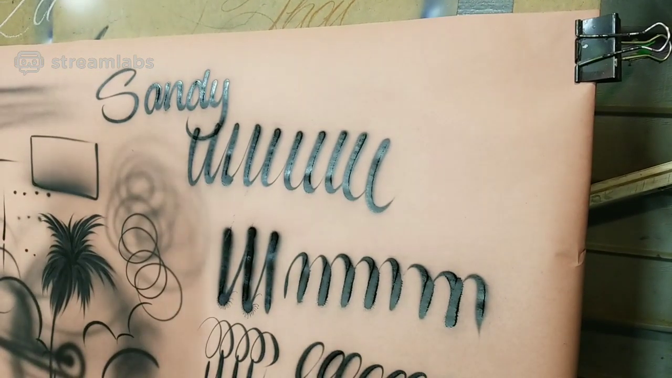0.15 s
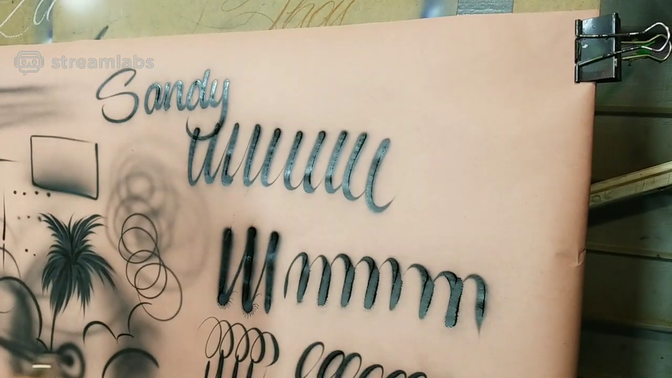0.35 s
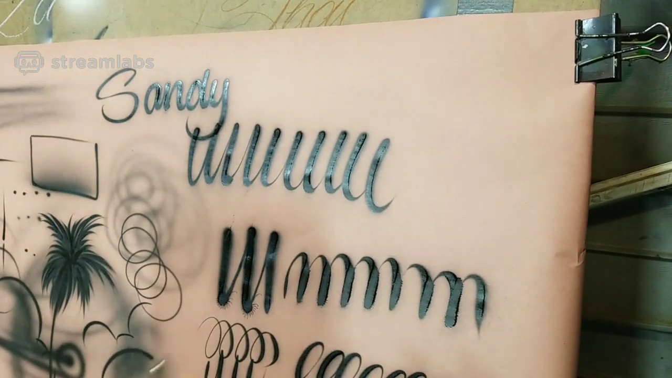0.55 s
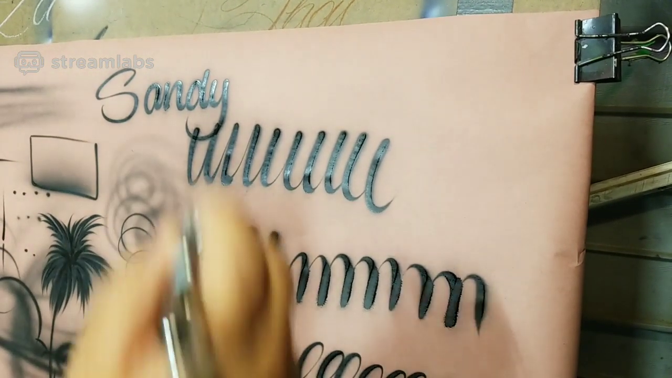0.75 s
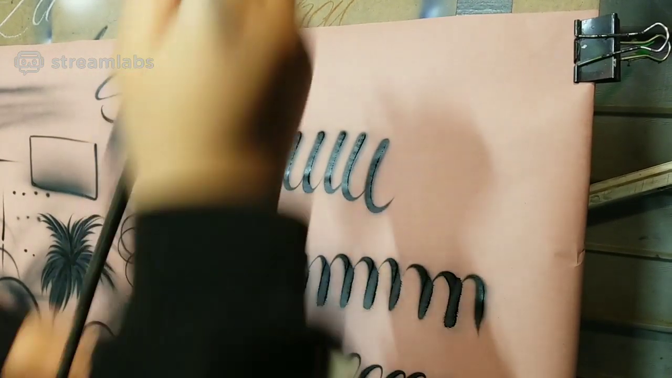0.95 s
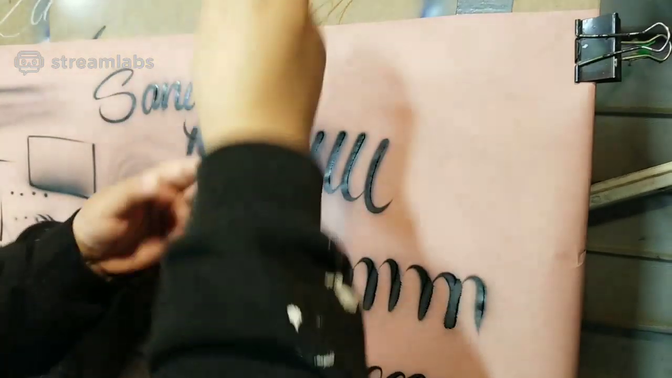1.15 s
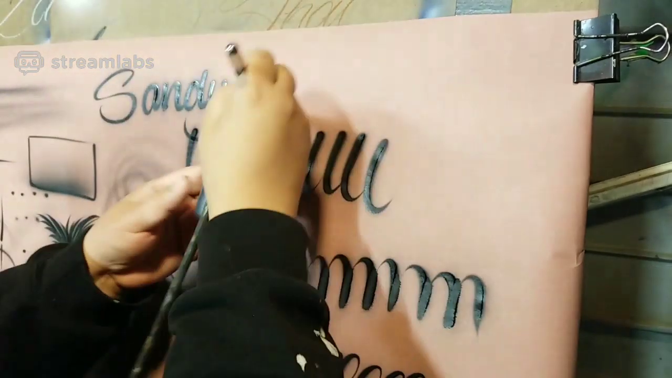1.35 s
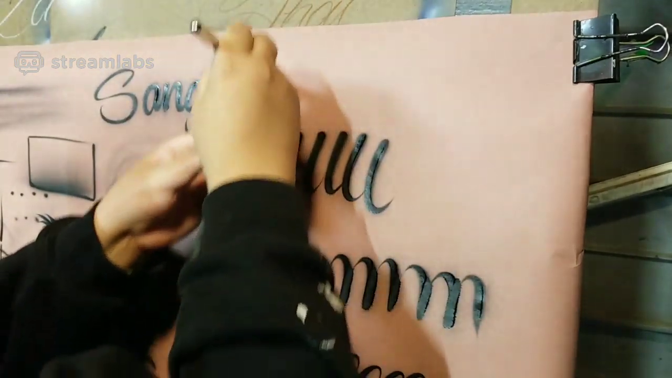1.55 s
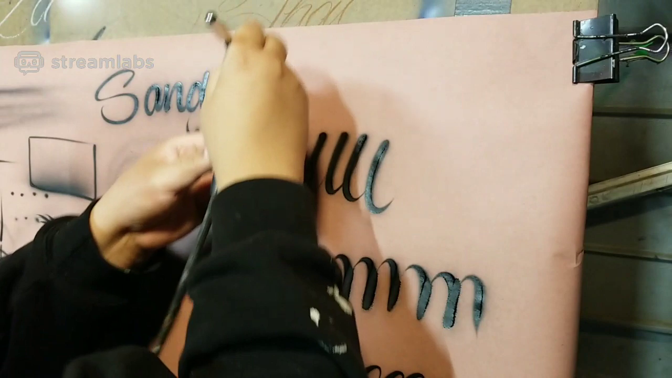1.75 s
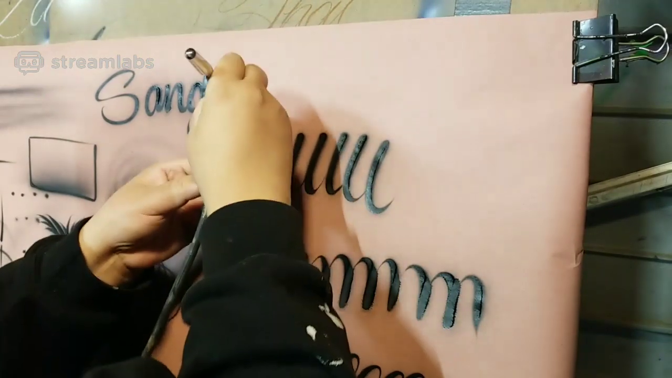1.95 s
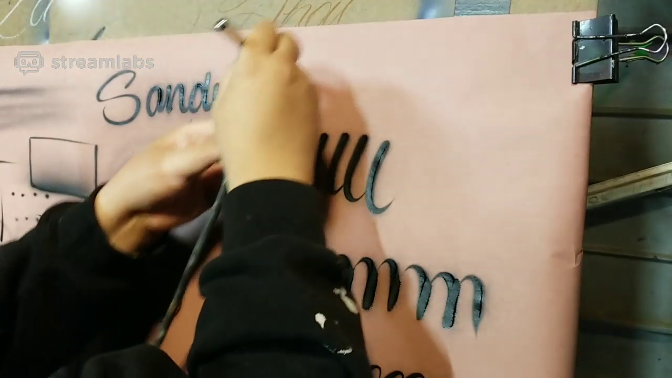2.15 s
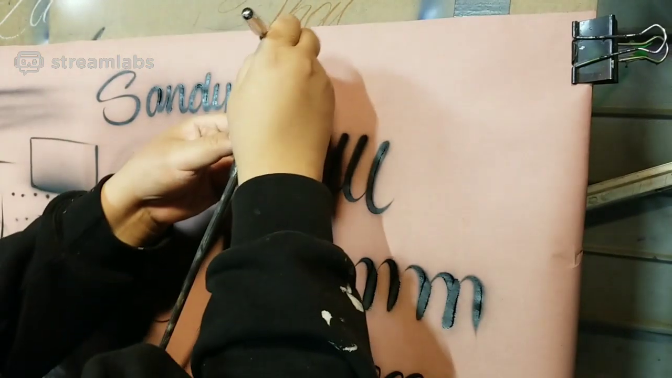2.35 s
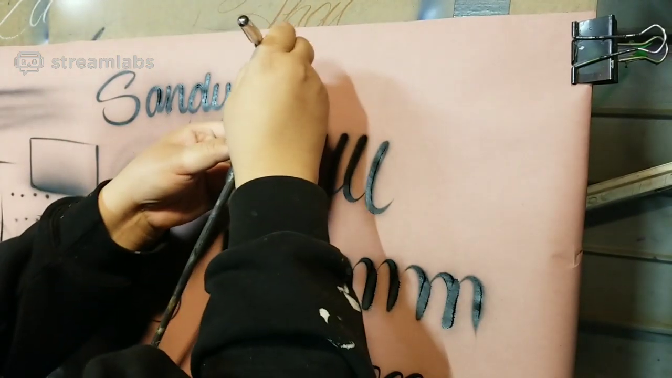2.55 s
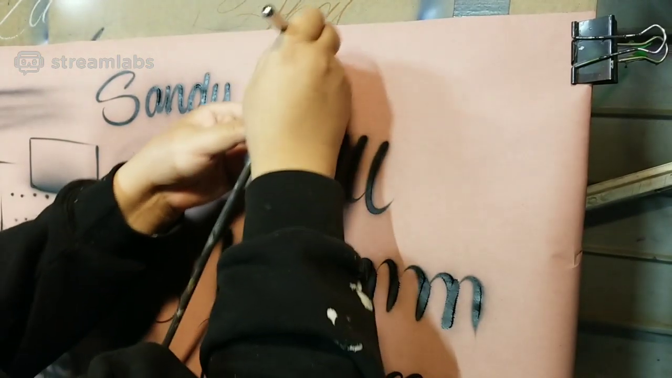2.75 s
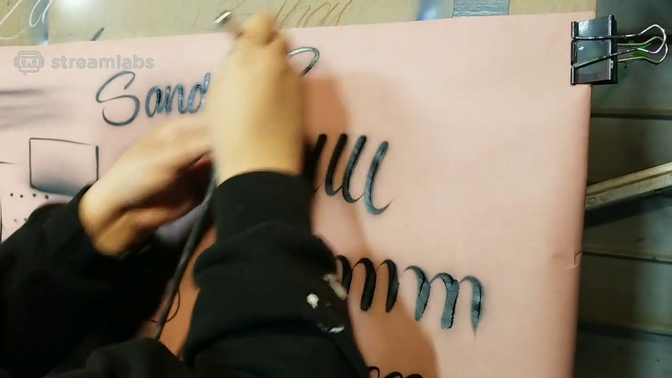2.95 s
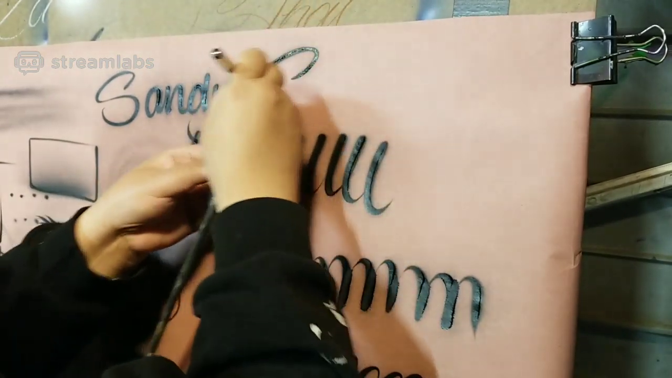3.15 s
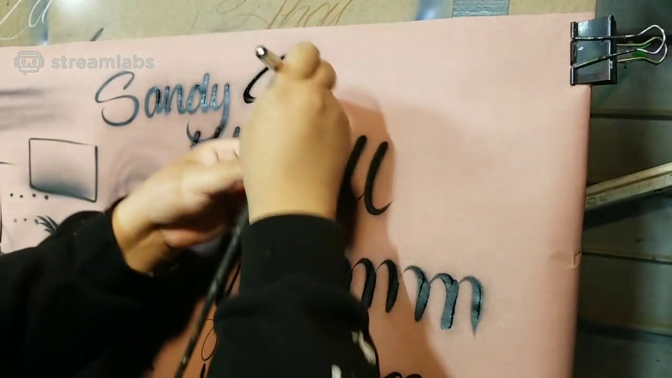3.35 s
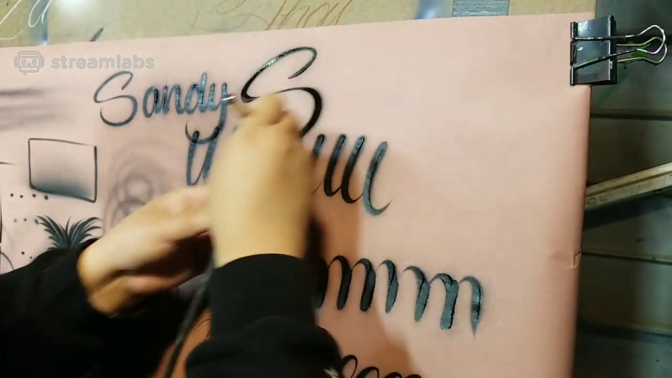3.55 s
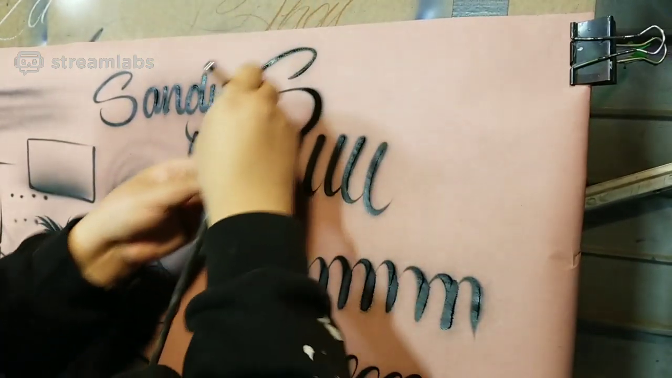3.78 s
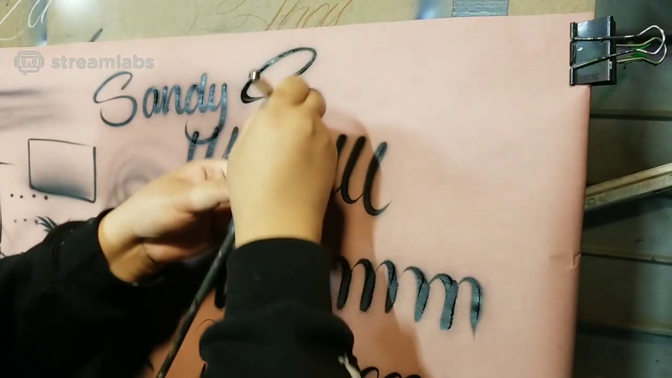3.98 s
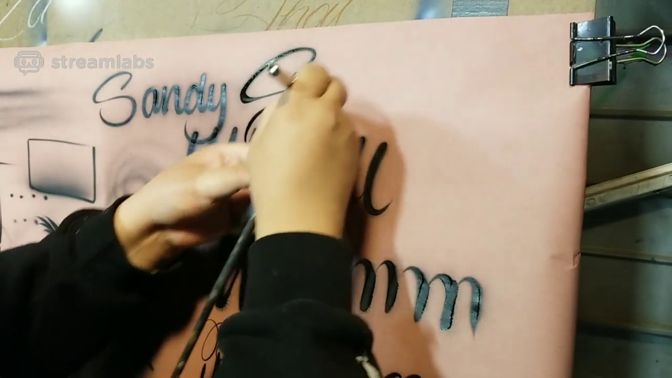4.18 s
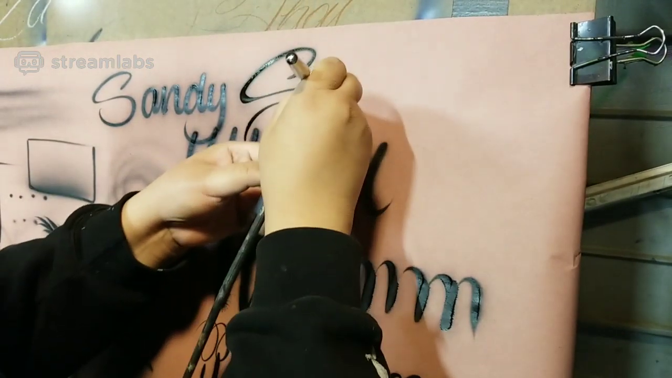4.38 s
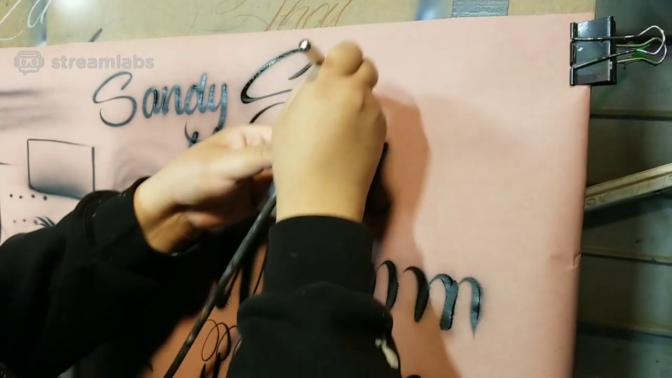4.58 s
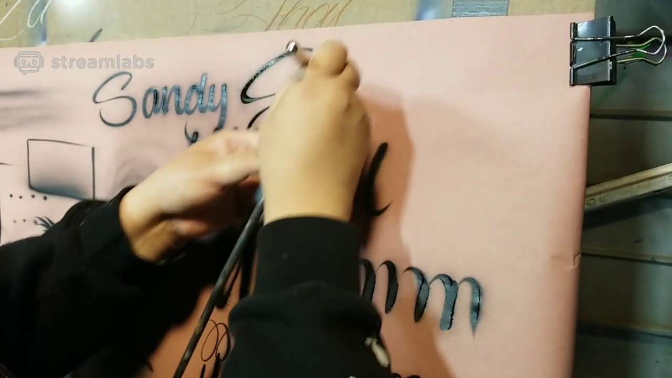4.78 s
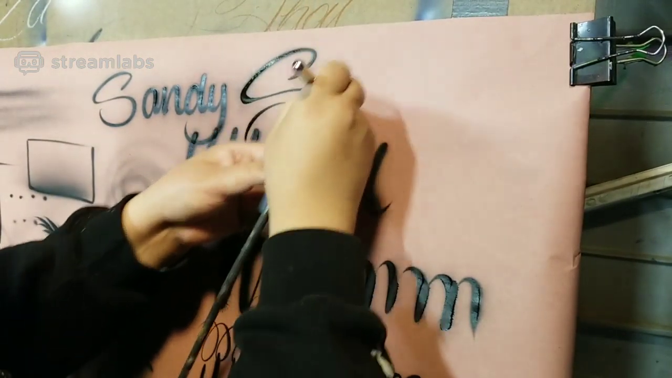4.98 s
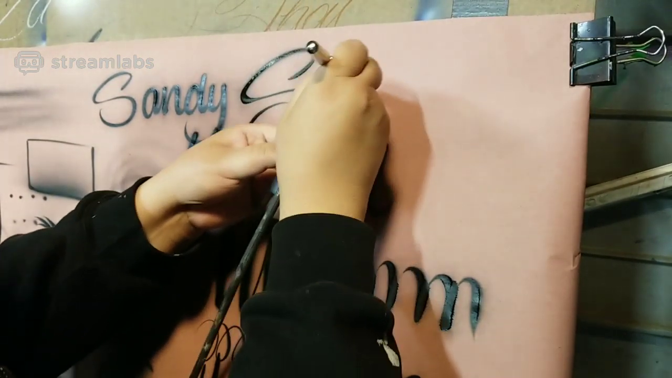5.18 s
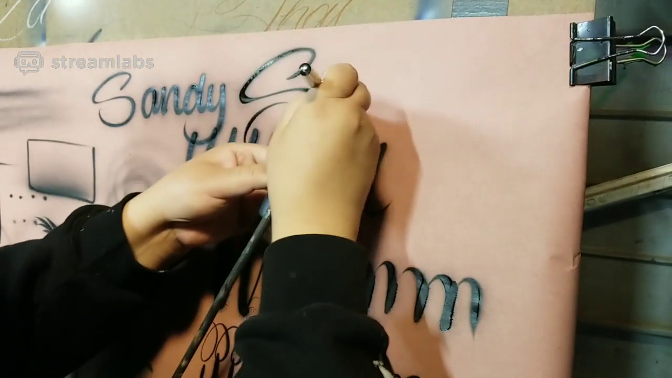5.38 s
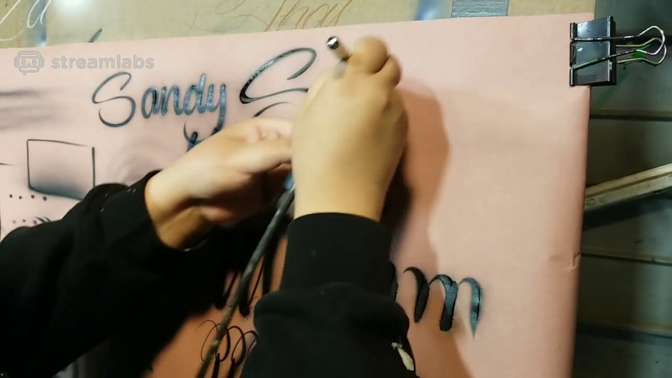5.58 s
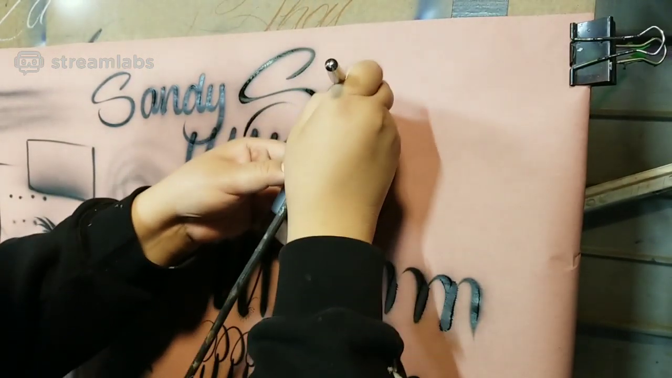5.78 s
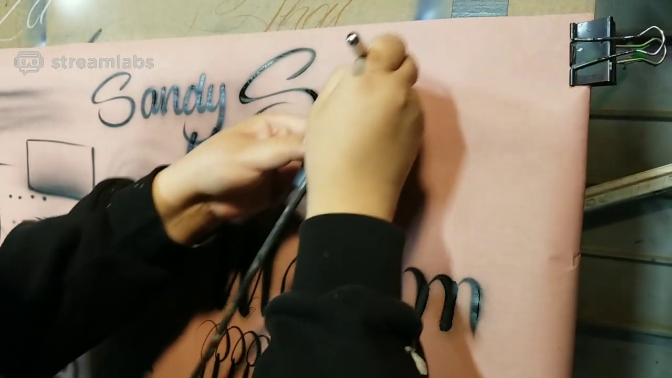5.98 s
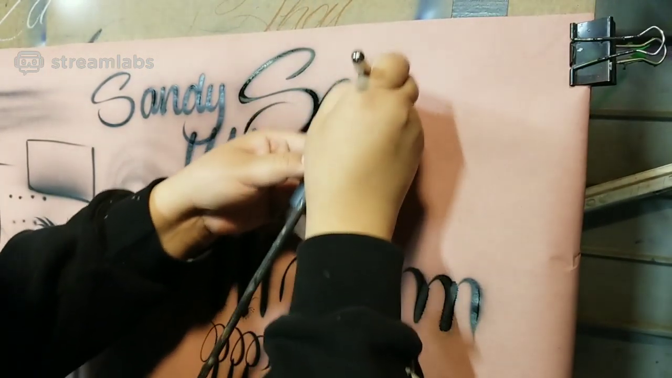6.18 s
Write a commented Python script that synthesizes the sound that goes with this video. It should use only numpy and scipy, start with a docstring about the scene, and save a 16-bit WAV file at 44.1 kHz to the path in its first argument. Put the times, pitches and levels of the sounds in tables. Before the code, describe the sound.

A close stereo microphone, stronger on the left, catches a few gritty rustles and a short hollow thump over faint room air and low street rumble. After tiny clicks, a sharp, high spray of compressed air begins, rougher at first, then thinner, pulsing two or three times a second with brief dips. A distant engine climbs faintly in the background, changes gear, then fades, leaving tyre wash and muffled bumps.

```python
"""A few scuffs of shoes and sleeves close by, then an airbrush hisses on paper, swelling with each stroke.
Outside a vehicle pulls away through two gears and thumps over bumps; the workshop hums faintly. The left port hears more.
Spray, scuffs, tyres and air are filtered noise; exhaust, bumps, hum and hollow knocks are sines;
small ticks are impulses ringing in resonators. The microphone has two ports and a steep upper limit."""
import sys
import numpy as np
from scipy import signal
from scipy.io import wavfile
from scipy.ndimage import uniform_filter1d, map_coordinates

SR = 44100
rng = np.random.default_rng(int(sys.argv[2]) if len(sys.argv) > 2 else 0)


def int16_out(signal):
    """Quantize to a 16-bit WAV file."""
    q = np.round(np.clip(np.atleast_2d(signal).T, -1, 1) * 32767)
    wavfile.write(sys.argv[1], SR, q.astype(np.int16))


N = 274743

# Microphone: likeness of the two ports by pitch [f/Hz, likeness]
PORT_LIKENESS = [(60, 0.92), (130, 0.9), (290, 0.66), (640, 0.25), (1410, -0.069), (3100, -0.0076),
                 (6820, 0.26), (15000, -0.055)]
# Microphone: balance of the two ports by pitch [f/Hz, left over right level/dB]
PORT_BALANCE = [(30, 5), (92, 3.5), (210, 9), (330, 10.5), (500, 4.5), (1170, 6), (2740, 10), (4190, 6.5),
                (6410, 0), (9000, 1.5), (11500, 2), (13000, 8), (14500, 7), (15500, 17)]
# Room air: spectrum [f/Hz, density level/dB per Hz]
ROOM_SPECTRUM = [(600, 16), (800, -3.5), (1300, -10), (2200, 0), (3600, -2), (7000, -0.5), (9000, -8),
                 (12500, -4), (15500, -1.5)]
# Room: steady hum tones [f/Hz, level/dB]
HUM_TONES = [(59.5, -74), (657, -81.5)]
# Street outside [t/s, exhaust level/dB, rumble level/dB, tyre wash level/dB]
STREET_LEVELS = [(0, -70, -67, -78), (.5, -77, -69.5, -88), (1.3, -70.5, -69.5, -71),
                 (1.75, -69, -65.5, -69.5), (2.15, -63, -66, -68.5), (2.5, -71.5, -66.5, -67.5),
                 (3.4, -64, -64, -66), (4, -56.5, -61, -66.5), (4.65, -66, -62.5, -65),
                 (4.95, -60, -60, -60), (5.22, -69, -60.5, -62.5), (5.36, -86, -62, -63),
                 (6.23, -90, -62.5, -57.5)]
# Street rumble: spectrum [f/Hz, density level/dB per Hz]
RUMBLE_SPECTRUM = [(12, -60), (20, -20), (48, -5), (80, -3), (113, -2), (201, -12), (309, -10.5),
                   (420, -38), (550, -66), (920, -120)]
# Tyre wash: spectrum [f/Hz, density level/dB per Hz]
WASH_SPECTRUM = [(200, -3), (350, -8.5), (550, -2.5), (800, -1.5), (1100, -7.5), (1600, -4)]
# Vehicle gears [engaged t/s, exhaust note f/Hz, initial climb/(Hz/s), easing time/s]
GEAR_CLIMBS = [(0, 123.9, 44, 6), (1.78, 128.5, 16, 2.9)]
# Exhaust orders [multiple of the note, level/dB, flutter level/dB]
EXHAUST_ORDERS = [(1, 2.5, 2), (1.5, -10.5, 6.5), (2, -11.5, 4)]
# Road bumps under the vehicle [t/s, level/dB, f/Hz]
ROAD_BUMPS = [(3.581, -45.5, 83), (3.792, -44.5, 83.4), (4.94, -46, 82.5), (5.037, -50, 77.4),
              (5.142, -48, 75.4), (5.325, -51, 86.1), (5.399, -50, 67.3), (5.615, -51, 83.4),
              (5.88, -45, 84), (6.187, -48, 104)]
# Bumps against something hollow [t/s, level/dB, swell time/s]
HOLLOW_KNOCKS = [(1.137, -40.5, 0.0066), (1.378, -52, 0.01)]
# Scuffs of shoes and sleeves
# [t/s, level/dB, rise/s, t60/s, grit f/Hz, grit width/Hz, relative knock level/dB, relative swish level/dB]
SCUFF_EVENTS = [(0.0, -63.5, 0.00067, 0.41, 3540, 3020, -6, -3),
                (0.142, -56.5, 0.015, 0.3, 3830, 3000, -2, -8),
                (.22, -70, .004, 0.19, 3500, 3000, -10, -12),
                (.538, -55, 0.048, 0.22, 4570, 2700, -14.5, -8),
                (0.739, -46.5, 0.02, 0.31, 3260, 3180, -8, -7),
                (1.132, -42, 0.0065, 0.31, 2670, 2270, 0.5, -41),
                (1.309, -66.5, 0.032, 1, 3700, 3950, 3, -22),
                (1.372, -59, 0.035, 0.48, 3000, 2980, 4.5, -20),
                (1.401, -58, 0.014, 0.26, 4360, 4970, -3, -2),
                (1.44, -57.5, 0.011, 0.74, 3140, 2500, 2.5, -16)]
# Floorboard resonances excited by the scuffs [f/Hz, width/Hz, level/dB]
BOARD_MODES = [(150, 230, -8), (352, 51, -3), (523, 240, -4.5), (834, 85, 0), (1090, 220, -5),
               (2070, 350, -6)]
# Small dry ticks [t/s, blow level/dB, relative blow level of the lower ring/dB]
DRY_TICKS = [(1.443, -21, -14), (1.538, -22, 2)]
# Airbrush strokes, dipping at each turn of the hand
# [t/s, nozzle level/dB, jet-on-paper level/dB, nozzle fullness level/dB]
STROKES = [(1.66, -35, -37.5, -6), (1.93, -32, -38, -8), (2.1, -33, -41, -5), (2.31, -31.5, -37.5, -10),
           (2.5, -29.5, -43.5, -8.5), (2.65, -40.5, -49.5, -5.5), (2.84, -29.5, -42, -8.5),
           (2.96, -29, -38.5, -7), (3.25, -39.5, -47, -4.5), (3.35, -31, -44.5, -4),
           (3.44, -34.5, -36.5, -3.5), (3.62, -31.5, -38, -7), (3.82, -41, -48.5, -2.5),
           (3.96, -31.5, -43.5, -8), (4.09, -34.5, -46, -7.5), (4.27, -31.5, -37, -3.5),
           (4.53, -31, -45, -19), (4.74, -30, -40, -4), (4.88, -28, -39, -9.5), (5.05, -35, -44.5, -9.5),
           (5.2, -32, -42, -4.5), (5.34, -31, -41, -9.5), (5.49, -39, -45.5, -6), (5.63, -30.5, -40, -4),
           (5.77, -31, -39, -5), (5.92, -36.5, -46, -7.5), (6.08, -32, -38, -2), (6.23, -33.5, -37, -9)]
# Nozzle hiss: spectrum [f/Hz, density level/dB per Hz]
NOZZLE_SPECTRUM = [(7500, -52), (8700, -20), (10500, -12), (11500, -5.5), (13000, -5.5), (14200, -1),
                   (15000, -4), (15700, -1.5)]
# Jet striking paper: spectrum [f/Hz, density level/dB per Hz]
PAPER_SPECTRUM = [(600, -18.5), (900, -19), (1400, -12), (2300, -5.5), (3300, -1), (4300, -0.5),
                  (5500, -2.5), (7300, -1), (8600, -6), (10500, -3.5)]
# Nozzle fullness by pitch [f/Hz, share of the fullness level]
FULLNESS_SHARES = [(9000, 0.94), (12000, 1.06), (13800, 0.07)]
# Low side of the paper roar by pitch [f/Hz, share of the depth level]
DEPTH_SHARES = [(800, 0.44), (1500, 1.16), (2400, 0.56), (3500, 0.02)]
# High side of the paper roar by pitch [f/Hz, share of the edge level]
EDGE_SHARES = [(3000, -0.21), (4800, -0.064), (7000, 0.36)]
# Slow colour change of the paper roar [t/s, low-side level/dB, high-side level/dB]
ROAR_COLOURS = [(1.7, -1, 0.5), (2.4, -5, -1), (3.3, -5, 1), (3.9, -2.5, -2.5), (4.3, -1, 2.5),
                (4.9, -2, 3.5), (5.6, -2, 6), (6.23, -2.5, 1)]

CUTOFF_HZ = 15500
ROOM_DB = -74.5
LIFT_OFF_S, SAG_HZ_PER_S = 4.83, 85   # the driver lifts off and the note sags
HOLLOW_HZ = 867
TRIGGER_S, OPENING_S = 1.609, .013
STROKE_SMOOTH_S = 0.1   # the hand rounds every change
USUAL_NOZZLE_DB, USUAL_PAPER_DB, USUAL_FULLNESS_DB = -33.5, -36, -5.5
BUILD_S, BUILD_DB = .025, -5.5   # pressure builds after the valve opens
BLAST_DEPTH_DB, BLAST_FADE_S = 6, 0.24   # the first blast on the paper is deeper, then thins
DEPTH_PER_DB = -.3   # dB per dB: a stronger jet on the paper has less low side
EDGE_PER_DB, BLAST_EDGE_DB = .5, -8   # the high side grows as the nozzle gains on the paper
PAN_PER_NOZZLE_DB, PAN_PER_FULLNESS_DB = .4, 0.05   # a louder, fuller nozzle faces the left port
NOZZLE_PAN_DB, PAPER_PAN_DB = -1, 0.6


def from_db(db):
    """Decibels to gain."""
    return 10 ** (np.asarray(db) / 20)


def rms_one(x):
    """Scale to unit rms."""
    return x / np.sqrt(np.mean(x ** 2) + 1e-20)


def in_time(rows):
    """Columns of a curve table, one value a sample."""
    s, *columns = np.transpose(rows)
    return [np.interp(np.arange(N) / SR, s, column) for column in columns]


def at_hz(points, hz):
    """Read a curve on a log-frequency axis."""
    points_hz, values = np.transpose(points)
    return np.interp(np.log(hz), np.log(points_hz), values)


def drift(rate):
    """Random wander of unit rms, smoothed by a double pole at the given rate in Hz."""
    step = 40   # drawn once every 40 samples, then interpolated
    r = np.exp(-2 * step * np.pi * rate / SR)
    draws = rng.standard_normal(N // step + 2002)
    slow = signal.lfilter([1], [1, -2 * r, r * r], draws)[2000:]   # skip the run-in
    return np.interp(np.arange(N) / step, np.arange(len(slow)), rms_one(slow))


def sides(pan_db):
    """Left and right gains for a left-over-right level."""
    return from_db(np.multiply.outer([.5, -.5], pan_db + np.zeros(N)))


def ports(white, hz, alike_add):
    """Two unrelated noises become left and right with the likeness and balance of this pitch."""
    alike = np.clip(at_hz(PORT_LIKENESS, hz) + alike_add, 0, 1)
    common = np.sqrt(1 + alike) * white[0]
    opposed = np.sqrt(1 - alike) * white[1] * [[1], [-1]]
    return (common + opposed) * from_db(at_hz(PORT_BALANCE, hz) * np.array([[.5], [-.5]]))


def bands(spectrum, count, patchy_db=0, rate=3, tones=(), alike_add=0):
    """Stereo noise in bands; if tone curves are given they lift each band, which also wanders on its own."""
    top_hz = min(spectrum[-1][0] * 1.05, 16500)
    edges = np.geomspace(spectrum[0][0], top_hz, count + 1)
    white = rng.standard_normal((2, 2, N))   # neighbouring bands use different noise
    out, plain_power = 0, 0
    for k, (low, high) in enumerate(zip(edges, edges[1:])):
        hz = np.sqrt(low * high)
        band_pass = signal.butter(2, [low, high], "band", fs=SR, output="sos")
        band = from_db(at_hz(spectrum, hz)) * signal.sosfilt(band_pass, white[k % 2])
        plain_power += np.mean(band ** 2)
        pair = ports(band, hz, alike_add)
        if tones:
            band_db = sum(tone_db * at_hz(shares, hz) for shares, tone_db in tones)
            wander_db = patchy_db * np.array([drift(rate), drift(rate)])
            pair = pair * from_db(band_db + wander_db)
        out = out + pair
    return out / np.sqrt(plain_power)


def resonance(x, hz, width):
    """Two-pole peak of gain 1."""
    r = np.exp(-np.pi * width / SR)
    zeros = np.array([1, 0, -1]) * (1 - r * r) / 2
    poles = [1, -2 * r * np.cos(2 * np.pi * hz / SR), r * r]
    return signal.lfilter(zeros, poles, x)


def delayed(x, lag_s):
    """Read a signal late by a changing lag."""
    return map_coordinates(x, [np.arange(N) - lag_s * SR], order=3)


def room_air():
    """The faint air of the room: steady broadband noise."""
    return from_db(ROOM_DB) * bands(ROOM_SPECTRUM, count=10)


def hum():
    """Steady sines, stronger at the left port."""
    t = np.arange(N) / SR
    tones = sum(from_db(db) * np.sin(2 * np.pi * hz * t) for hz, db in HUM_TONES)
    return tones * sides(9.2)


def street():
    """Low rumble and the wash of tyres: noise bands following the street levels."""
    _, rumble_db, wash_db = in_time(STREET_LEVELS)
    rumble = from_db(rumble_db) * bands(RUMBLE_SPECTRUM, count=10)
    wash = from_db(wash_db) * bands(WASH_SPECTRUM, count=7)
    return rumble + wash


def exhaust_note():
    """The note climbs ever more slowly in each gear and sags after lift-off."""
    t, note_hz = np.arange(N) / SR, np.zeros(N)
    for s, hz, climb, ease in GEAR_CLIMBS:
        in_gear_s = np.minimum(t, LIFT_OFF_S) - s
        gear_hz = hz + climb * ease * (1 - np.exp(-in_gear_s / ease))
        note_hz = np.where(t >= s, gear_hz, note_hz)
    coasting = np.maximum(t - LIFT_OFF_S, 0)
    exhaust_db = in_time(STREET_LEVELS)[0]
    return np.maximum(note_hz - SAG_HZ_PER_S * coasting, 60), exhaust_db


def exhaust():
    """Multiples of one unsteady exhaust note, each wavering in level."""
    note_hz, note_db = exhaust_note()
    turn = 2 * np.pi * np.cumsum(note_hz * (1 + .004 * drift(6))) / SR
    out = 0
    for k, db, flutter_db in EXHAUST_ORDERS:
        out = out + from_db(note_db + db + flutter_db * drift(4.9)) * np.sin(k * turn)
    return out * sides(8.9)


def road_bumps():
    """Each bump is a soft low push: a sine that swells and dies quickly."""
    out, t = np.zeros((2, N)), np.arange(SR // 5) / SR
    for s, db, hz in ROAD_BUMPS:
        at = round(s * SR)
        swell = t / 0.021 * np.exp(1 - t / 0.014)
        push = from_db(db) * swell * np.sin(2 * np.pi * hz * t)
        out[:, at:at + len(t)] += push[:N - at] * from_db([[2.3], [-2.3]])
    return out


def knocks():
    """A hollow body rings briefly on one note, a little unsteadily."""
    out, t = np.zeros(N), np.arange(SR // 5) / SR
    for s, db, swell in HOLLOW_KNOCKS:
        wobble = np.cumsum(rng.normal(0, .015, len(t)))
        envelope = t / swell * np.exp(1 - t / swell)
        at = round(s * SR)
        out[at:at + len(t)] += from_db(db) * envelope * np.sin(2 * np.pi * HOLLOW_HZ * t + wobble)
    return out * sides(6.0)


def ticks():
    """Single impulses ring a higher and a lower broad resonance."""
    blows = np.full((2, N), 1e-18)   # not quite zero, which keeps the filters fast
    for s, db, lower_db in DRY_TICKS:
        blows[:, round(s * SR)] = from_db([db, db + lower_db])
    higher = resonance(resonance(blows[0], 4000, 1100), 4000, 1100)
    lower = resonance(resonance(blows[1], 1500, 700), 1500, 700)
    return (higher + lower) * sides(9.1)


def scuffs():
    """Friction swells and dies: grit, a knock in the boards, a thin swish; the room holds a duller tail."""
    out, size = np.zeros((2, N)), SR * 3 // 5
    t = np.arange(size) / SR
    low = signal.butter(10, 8000, "low", fs=SR, output="sos")
    high = signal.butter(6, 11000, "high", fs=SR, output="sos")
    for s, db, rise, t60, hz, width, knock_db, swish_db in SCUFF_EVENTS:
        # the contact catches unevenly: the noise comes in lumps of a few ms, partly common to both ports
        lumps = from_db(1.3 * rms_one(uniform_filter1d(rng.standard_normal(size), size=90)))
        white = lumps * (rng.standard_normal((2, size)) + 0.55 * rng.standard_normal(size))
        grit = rms_one(signal.sosfilt(low, resonance(resonance(white, hz, width), hz, width)))
        grit = grit + 0.25 * resonance(grit, 3560, 280)   # the microphone port rings in one narrow band
        knock = 0
        for mode_hz, mode_width, mode_db in BOARD_MODES:
            blow = lumps * rng.standard_normal((2, size))
            knock = knock + from_db(mode_db) * resonance(blow, mode_hz, mode_width)
        knock = rms_one(knock)
        swish = rms_one(signal.sosfilt(high, white)) * from_db([[-2], [2]])
        tail = rms_one(resonance(rng.standard_normal((2, size)), 3250, 1300))
        swell = from_db(db) * np.minimum(t / rise, 1)
        late = np.maximum(t - rise, 0)
        body = from_db(-60 * late / t60) * (grit + from_db(knock_db) * knock)
        thin = from_db(swish_db - 60 * late / (1.3 * t60)) * swish
        held = from_db(-23.5 - 60 * late / 7.8) * tail * (1 - t / t[-1])
        at = max(round(s * SR), 0)
        out[:, at:at + size] += swell * (body + thin + held)
    return out * sides(9.1)


def spray_controls():
    """Levels come from the strokes; depth, edge and pan follow them."""
    smooth_size = max(round(STROKE_SMOOTH_S * SR), 1)
    nozzle_db, paper_db, full_db = uniform_filter1d(in_time(STROKES), size=smooth_size, axis=1)
    spraying_s = np.maximum(np.arange(N) / SR - TRIGGER_S, 0)
    blast = np.exp(-(spraying_s / BLAST_FADE_S) ** 2)
    nozzle_swing = nozzle_db - USUAL_NOZZLE_DB
    paper_swing = paper_db - USUAL_PAPER_DB
    full_db = full_db - USUAL_FULLNESS_DB
    low_db, high_db = in_time(ROAR_COLOURS)
    # nozzle and low side start weaker, the low side by twice as many dB
    building_db = BUILD_DB * np.exp(-spraying_s / BUILD_S)
    deep_db = 2 * building_db + low_db + DEPTH_PER_DB * paper_swing + BLAST_DEPTH_DB * blast
    edge_db = high_db + EDGE_PER_DB * (nozzle_swing - paper_swing) + BLAST_EDGE_DB * blast
    pan_db = NOZZLE_PAN_DB + PAN_PER_NOZZLE_DB * nozzle_swing + PAN_PER_FULLNESS_DB * full_db
    return nozzle_db + building_db, paper_db, full_db, deep_db, edge_db, pan_db


def airbrush():
    """Shear noise at the nozzle and the duller roar of the jet striking paper, both shaken by eddies."""
    nozzle_db, paper_db, full_db, deep_db, edge_db, pan_db = spray_controls()
    valve = np.clip((np.arange(N) / SR - TRIGGER_S) / OPENING_S, 0, 1) ** 2
    eddies = from_db(0.18 * drift(126))
    nozzle = bands(NOZZLE_SPECTRUM, count=12, patchy_db=1.26, rate=12.0,
                   tones=[(FULLNESS_SHARES, full_db)], alike_add=.45)
    paper = bands(PAPER_SPECTRUM, count=12, patchy_db=1.3, rate=7.4,
                  tones=[(DEPTH_SHARES, deep_db), (EDGE_SHARES, edge_db)], alike_add=0.27)
    nozzle = from_db(nozzle_db) * nozzle * sides(pan_db)
    paper = from_db(paper_db) * paper * sides(PAPER_PAN_DB)
    # an echo off the moving hand combs sliding ridges into the thin hiss
    nozzle = np.array([x + 0.39 * delayed(x, 0.0015 + .0001 * drift(1.34)) for x in nozzle])
    left, right = valve * eddies * (nozzle + paper)
    # the path to the right port changes as the hand travels
    return np.array([left, delayed(right, .00006 * drift(1.0))])


def scene():
    """All sources at the two ports."""
    background = room_air() + hum() + street()
    vehicle = exhaust() + road_bumps()
    return background + vehicle + knocks() + ticks() + scuffs() + airbrush()


def record(dry):
    """The microphone's top is cut steeply by an elliptic low-pass."""
    return signal.sosfilt(signal.ellip(16, .5, 85, CUTOFF_HZ, fs=SR, output="sos"), dry)


dry = scene()
out = record(dry)
int16_out(out)
```